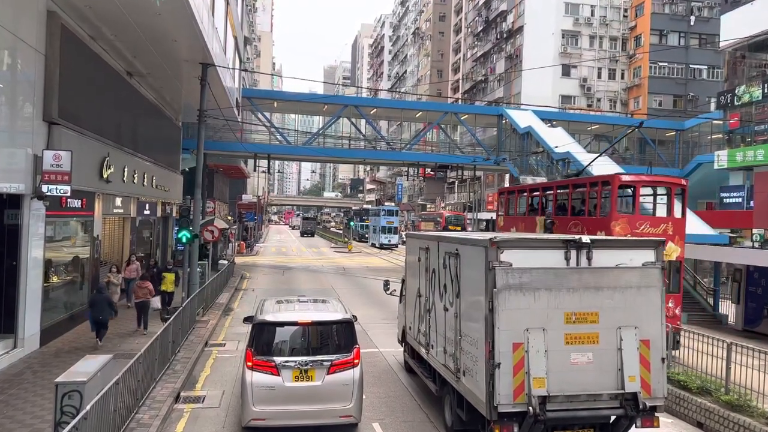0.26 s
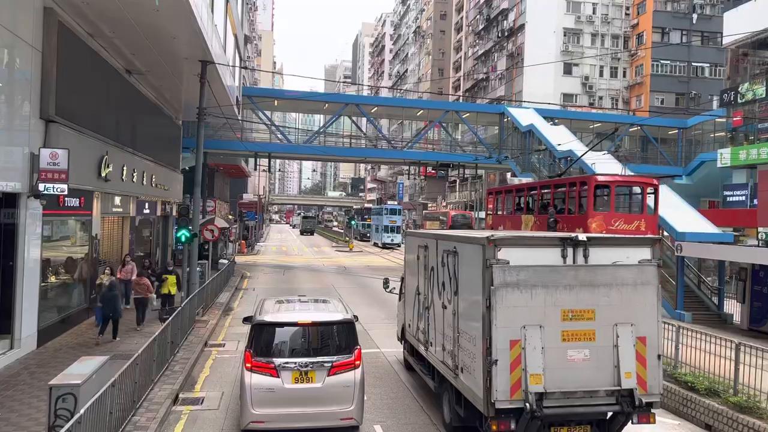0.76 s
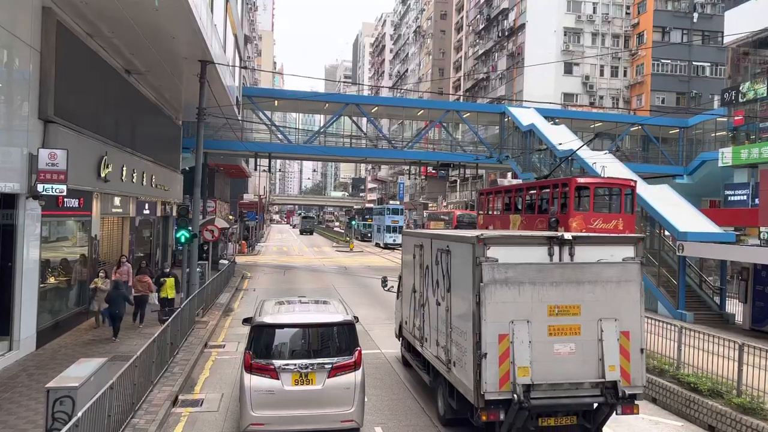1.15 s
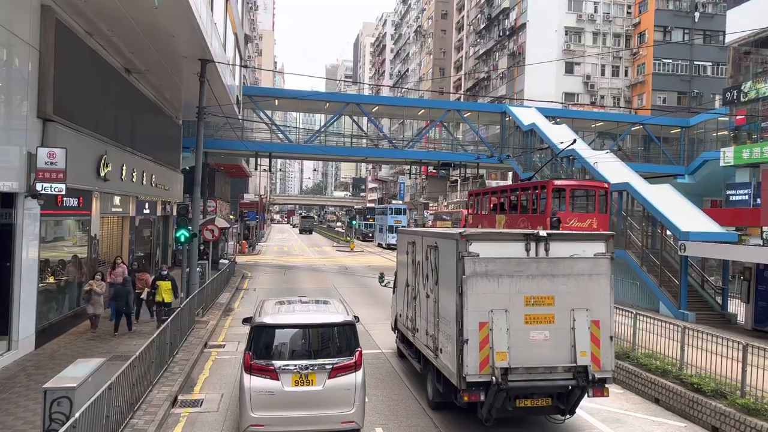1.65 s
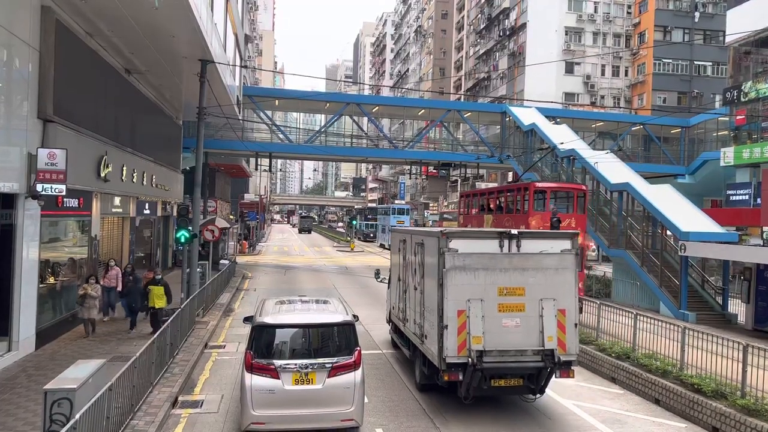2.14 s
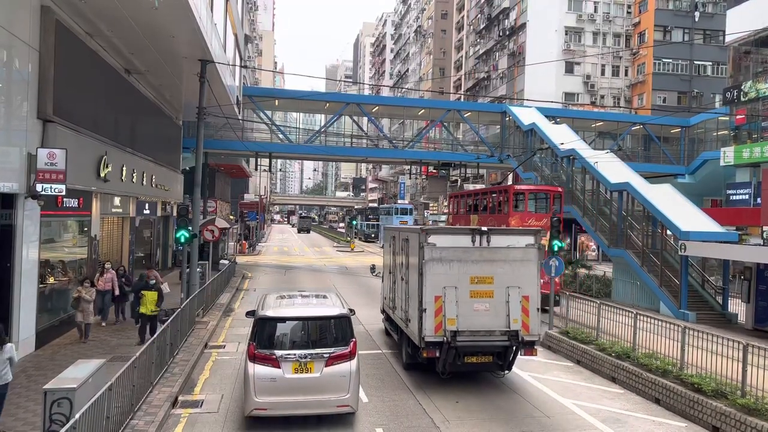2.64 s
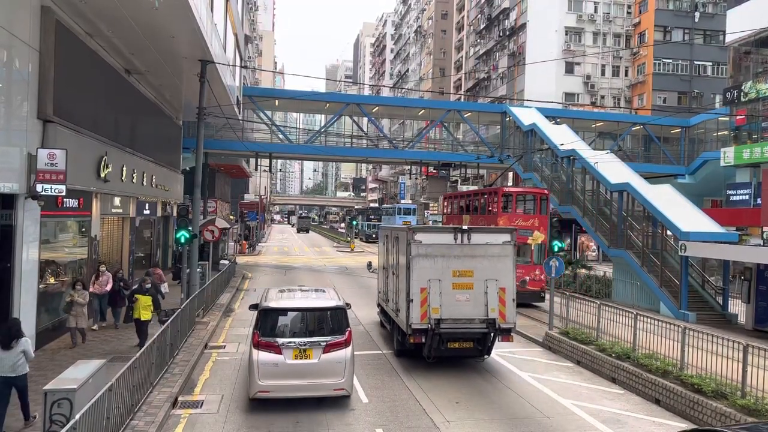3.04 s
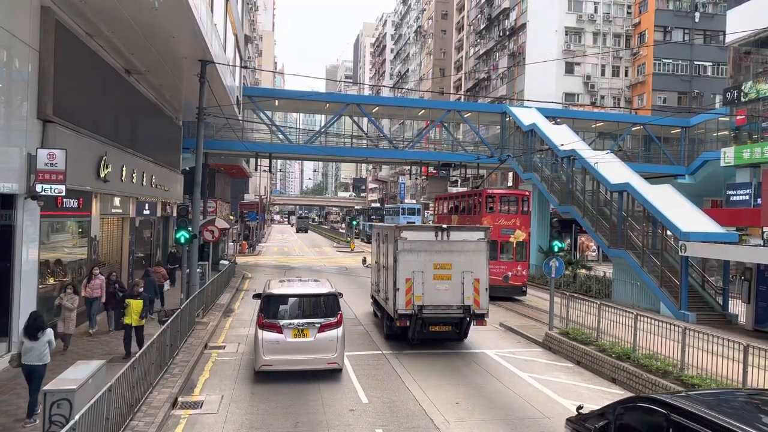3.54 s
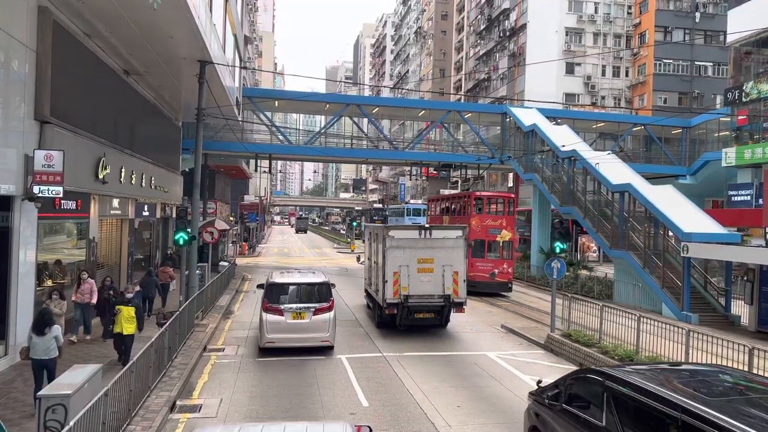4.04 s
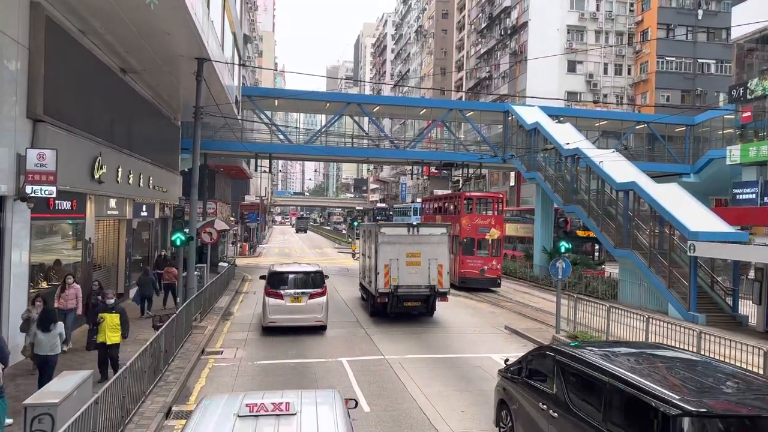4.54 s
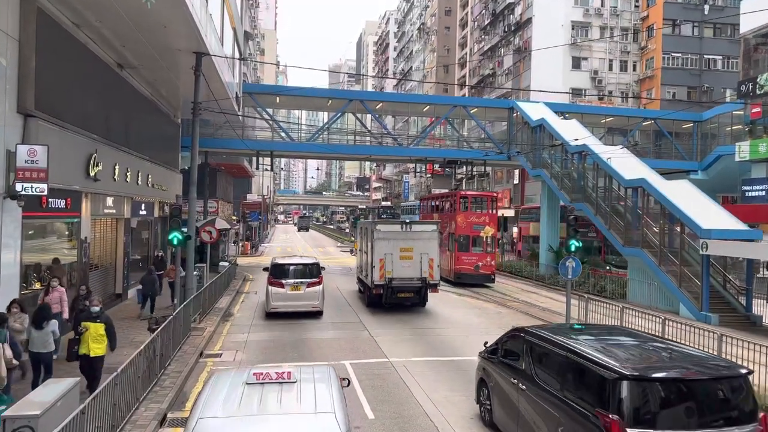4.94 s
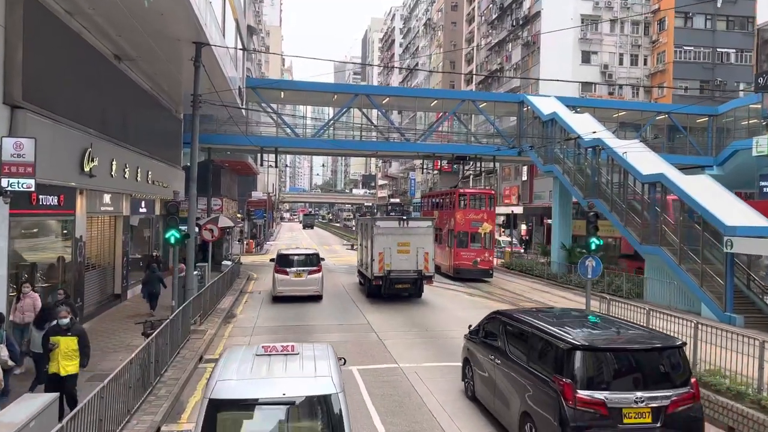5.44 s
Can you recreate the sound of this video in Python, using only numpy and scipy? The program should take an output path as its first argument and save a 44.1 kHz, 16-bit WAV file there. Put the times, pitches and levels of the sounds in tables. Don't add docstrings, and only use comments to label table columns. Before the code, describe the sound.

Aboard a bus, a low diesel idle and an echoing horn give way to a loud, rising engine as it sets off.

```python
import sys
import numpy as np
from scipy import signal
from scipy.fft import rfft, irfft
from scipy.io import wavfile
from scipy.ndimage import uniform_filter1d

SR = 44100
rng = np.random.default_rng(int(sys.argv[2]) if len(sys.argv) > 2 else 0)


def how_loud(loudness_db):
    steps = np.asarray(loudness_db, float) / 20
    return 10 ** steps


def wav_out(sig):
    wavfile.write(sys.argv[1], SR, np.round(np.clip(np.atleast_2d(sig).T, -1, 1) * 32767).astype(np.int16))


N = 250929
T = np.arange(N) / SR
HZ = np.fft.rfftfreq(N, 1 / SR) + 1


def unit(x):
    return x / np.sqrt(np.mean(np.abs(x) ** 2))


def over_time(table):
    s, *columns = np.transpose(table)
    return [np.interp(T, s, column) for column in columns]


def over_hz(table):
    hz, value = np.transpose(table)
    return np.interp(np.log(HZ), np.log(hz), value)


def walk(rate):
    hold = int(SR / rate)
    steps = np.repeat(rng.standard_normal(N // hold + 1), hold)
    smooth = uniform_filter1d(uniform_filter1d(steps, hold), hold)
    return unit(smooth[:N])


def fading(share, rate):
    share = np.clip(share, 0, 1)
    scattered = walk(rate) + 1j * walk(rate)
    return np.sqrt(1 - share) + np.sqrt(share / 2) * scattered


def noise(shape):
    return unit(irfft(rfft(rng.standard_normal(N)) * shape, N))


def peak(hz, width):
    return 1 / np.sqrt(1 + ((HZ - hz) / (width / 2)) ** 2)


# f/Hz, width/Hz, level/dB
CABIN_MODES = [(70.2, 2.7, -20), (73.76, 7.7, -18), (82.6, 4.6, -22.5), (104, 9, -31.5), (121, 16, -31),
               (146.8, 5.2, -29), (157.7, 14.3, -25), (181.3, 11, -28), (196.8, 7.3, -26.5),
               (220.5, 13.7, -20), (237, 21, -28.5), (396, 30, -47.5), (446, 25, -34.5)]


def cabin_db(hz):
    power = 0
    for centre_hz, width, db in CABIN_MODES:
        power = power + how_loud(2 * db) / (1 + ((hz - centre_hz) / (width / 2)) ** 2) ** 2
    return 10 * np.log10(power)


# t/s, firing rate f/Hz, firing line level/dB
ENGINE_RUN = [(0.0, 35.07, -22), (1.8, 35.07, -22.5), (2.06, 35.75, -23), (2.3, 40.14, -23),
              (2.41, 39.69, -23), (2.6, 36.82, -61), (2.77, 35.86, -27), (3.14, 35.67, -34),
              (3.22, 36.08, -18), (3.38, 39.22, -26), (3.46, 40.59, -13.5), (3.68, 44.97, -9.5),
              (3.92, 48.78, -10), (4.3, 51.38, -11.5), (4.72, 56.3, -12.5), (5.02, 57.75, -11.5),
              (5.3, 59.28, -12.5), (5.69, 62.76, -13)]
# t/s, load (0-1)
ENGINE_LOAD = [(0, 0.24), (2.05, 0.01), (2.3, 0.8), (2.7, 0.6), (3.2, 0.11), (3.6, 0.66), (4.2, 0.7),
               (4.7, 0.78), (5.2, 0.95), (5.69, 0.95)]
WEAK_ORDER_SIXTHS = [4, 8, 9, 10, 14, 15, 16, 18, 22, 30, 36]
# idle level/dB, full-load level/dB
WEAK_ORDER_LEVELS = [(-49, -54.5), (-42, -43), (-57.5, -24.5), (-54, -44.5), (-39.5, -35), (-35.5, -38.5),
                     (-55, -42.5), (-40.5, -38), (-40, -50), (-45.5, -43), (-34.5, -69)]
COAST_DB, COAST_SHARE = -29.5, 0.48


def engine():
    hz, first_db = over_time(ENGINE_RUN)
    coast_db = COAST_SHARE * np.minimum(first_db - COAST_DB, 0)
    turn = 2 * np.pi * np.cumsum(hz * (1 + 0.002 * walk(12))) / SR
    load = np.clip(over_time(ENGINE_LOAD)[0], 0, 1)
    # order, level in dB, wavering share
    orders = [(1, first_db, .02), (2, cabin_db(2 * hz) + coast_db, .03),
              (4, cabin_db(4 * hz), .025), (8, cabin_db(8 * hz), .15)]
    for sixths, (idle_db, full_db) in zip(WEAK_ORDER_SIXTHS, WEAK_ORDER_LEVELS):
        orders.append((sixths / 6, idle_db + load * (full_db - idle_db), .15))
    out = 0
    for order, db, share in orders:
        out = out + how_loud(db) * np.exp(1j * order * (turn + order)) * fading(share, 14)
    ports = np.array([[how_loud(-1.24)], [how_loud(-2.5) * np.exp(.15j)]])
    return np.sqrt(2) * np.real(out * ports)


# t/s, length/s, level/dB
HORN_BLASTS = [
    (0.076, 0.189, -28),
    (0.332, 1.26, -28.5),
]
HORN_ATTACK_S, HORN_RELEASE_S, ECHO_DB, ECHO_T60_S = 0.065, 0.021, -6, 0.48
SAG_DB_PER_S = 2


def blow():
    out = 0
    for s, length, db in HORN_BLASTS:
        after = np.maximum(T - s - length, 0)
        attack = np.clip((T - s) / HORN_ATTACK_S, 0, 1)
        direct = np.clip(1 - after / HORN_RELEASE_S, 0, 1)
        echo = how_loud(ECHO_DB - 60 * after / ECHO_T60_S)
        held = how_loud(db - SAG_DB_PER_S * np.clip(T - s, 0, length))
        out = out + held * attack * np.maximum(direct, echo)
    return out


# left level/dB, right level/dB, phase lead of left/rad, fluttering share (0-1)
HORN_HARMONICS = [(13, 11, 2.5, 0.03), (2.5, -1, -2, 0.25), (3.5, 2, -1.5, 0.06), (4, 3, 2.5, 0.16),
                  (-1, 0, 0.57, 0.29), (-6.5, -8.5, 0.8, 0.41), (-8, -14, 4.5, 0.3), (-15, -18, 1, 0.33),
                  (-16, -28.5, 6, 0.42), (-17, -45, -0.5, 0.2), (-17.5, -36.5, 2, 0.9), (-20, -45, 1, 0.57),
                  (-22.5, -38, 2.5, 0.2), (-27, -38, -1.5, 0.3), (-52, -53, 19, .5),
                  (-29, -48.5, -4.5, 0.1), (-29, -55, 7, .5), (-47, -44, 11, .5)]
# f/Hz, level under the horn/dB
MATE_LINES = [(447, -8.5), (892, -35), (1342, -11.5), (1437, -10), (3360, -30), (4872, -34.5)]
# f/Hz, level/dB
RASP_SPECTRUM = [(900, -23), (1400, -14), (3000, 1), (6500, -13), (7500, -31), (8500, -17), (9700, -26),
                 (10500, -54.5)]
# t/s, 1st, 2nd and 3rd partial level/dB, 3rd partial left minus right/dB
STREET_PATHS = [(.1, 3, 1, 9, -8), (.2, -18.5, -0.5, -18.5, 20), (.28, -15, 10, -2, 7),
                (.34, -0.5, 8, 6.5, 1), (.48, -16, -1.5, -2.5, -4), (.56, -9.5, 1.5, -13, 3),
                (.64, -10, 5, 2.5, 10.5), (.78, -15, 3, 5, 4), (1.1, -12, 2, 6.5, -5),
                (1.27, -6.5, 1.5, 0, -10), (1.38, -7.5, -0.5, -4, -6), (1.6, -16.5, 5.5, -4.5, 9)]
HORN_HZ = 502.3
BEAT_HZ, BEAT_DEPTH = 56, .1


def horn():
    first_db, second_db, third_db, pan_db = over_time(STREET_PATHS)
    path_db = {0: first_db, 1: second_db, 2: third_db + np.array([pan_db, -pan_db]) / 2}
    hz = HORN_HZ + .5 * walk(12)
    turn = 2 * np.pi * np.cumsum(hz * (1 + .0013 * walk(150))) / SR
    beat = 2 * np.pi * np.cumsum(BEAT_HZ * (1 + 0.14 * walk(19.5))) / SR
    out = np.zeros((2, N))
    for k, (left_db, right_db, lead, share) in enumerate(HORN_HARMONICS):
        left = how_loud(left_db) * np.exp(1j * lead) * fading(.6 * share, 90)
        right = how_loud(right_db) * fading(.6 * share, 90)
        flutter = fading(.4 * share, 40) * fading(.5 * share, 170)
        flutter = flutter * (1 + BEAT_DEPTH * np.cos(beat + k))
        line = how_loud(path_db.get(k, 0)) * flutter * np.exp(1j * (k + 1) * turn)
        out += np.real(np.array([left, right]) * line)
    for line_hz, db in MATE_LINES:
        line = np.exp(2j * np.pi * line_hz * T)
        out += how_loud(db) * np.real([fading(.7, 40) * line for _ in range(2)])
    rasp = how_loud(over_hz(RASP_SPECTRUM))
    out += how_loud(-20) * np.array([noise(rasp), 1.6 * noise(rasp)])
    return out * blow()


# f/Hz, width/Hz, level/dB
SLIT_RESONANCES = [(2290, 670, -49), (4530, 380, -54), (4960, 350, -61), (6730, 400, -62),
                   (8650, 630, -68.5)]
VALVE_SHUT_S = 2.145


def brake_air():
    hiss = 0
    for hz, width, db in SLIT_RESONANCES:
        shape = peak(hz, width) ** 2
        hiss = hiss + how_loud(db + 1.5 * walk(16)) * np.array([noise(shape), .5 * noise(shape)])
    return hiss * np.clip((VALVE_SHUT_S - T) / 0.015, 0, 1)


# t/s, peak level/dB, ring t60/s, low part
# relative level/dB, left minus right/dB
FITTING_KNOCKS = [(0.2216, -28.5, 0.19, 6.5, 6.5), (2.1395, -27, 0.22, 1.5, 5), (3.675, -37.5, 0.22, -4, 9),
                  (3.7236, -32, 0.25, 2, 3), (4.2096, -33, 0.32, 1.5, 4.5), (4.6694, -37, 0.23, 1.5, 7),
                  (4.943, -28.5, 0.18, 0.5, 5.5), (4.964, -38.5, 0.6, -17, 10.5),
                  (5.044, -31, 0.2, 6.5, 3.5), (5.0787, -43.5, 0.2, -5, 0.5), (5.2424, -23.5, 0.2, 2, 1.5)]
CLACK_TOP_DB, CLACK_RISE_S = -18.5, 0.0019


def clacks():
    body_shape = peak(4300, 4500) ** 2 + .15 * peak(8400, 900)
    low_shape = peak(2000, 1500) ** 2
    body = np.array([noise(body_shape), noise(body_shape)])
    low = np.array([noise(low_shape), noise(low_shape)])
    top = noise(peak(12500, 4500) ** 2)
    out = np.zeros((2, N))
    for s, db, t60, low_db, pan_db in FITTING_KNOCKS:
        age = np.maximum(T - s, 0)
        envelope = (1 - np.exp(-age / CLACK_RISE_S)) * how_loud(-60 * age / t60)
        burst = body + how_loud(low_db) * low + how_loud(CLACK_TOP_DB) * top
        out += how_loud(db - 9.5) * envelope * burst * how_loud([[pan_db / 2], [-pan_db / 2]])
    return out


# t/s, peak level/dB
PLASTIC_TICKS = [(1.9753, -51.5), (2.804, -55), (2.9132, -50.5), (2.942, -59), (3.1373, -52.5),
                 (3.1664, -59), (3.195, -50.5), (3.223, -54), (3.2503, -49.5), (3.28, -58), (3.3354, -51)]


def ticks():
    top = noise(peak(12500, 4500) ** 2)
    out = np.zeros((2, N))
    for s, db in PLASTIC_TICKS:
        age = np.maximum(T - s, 0)
        out += how_loud(db + 1.0) * (T > s) * how_loud(-60 * age / .008) * top
    return out


# t/s, half length/s, level/dB
SPRING_PUFFS = [
    (2.69, 0.046, -54),
    (3.469, 0.099, -51),
    (4.9, 0.052, -60),
    (5.633, .05, -52),
]


def puffs():
    swell = sum(how_loud(db) * np.exp(-((T - s) / half) ** 2) for s, half, db in SPRING_PUFFS)
    shape = peak(5600, 2500) ** 2 + .1 * peak(12500, 3000) ** 2
    return swell * np.array([noise(shape), 0.74 * noise(shape)])


# f/Hz, level per Hz/dB
LOW_SPECTRUM = [(11, -38.5), (18, -8.5), (44, -1), (67, -8), (118, -14), (153, -16), (219, -17.5),
                (337, -18), (384, -22.5), (463, -19.5), (675, -28), (1160, -25.5), (1600, -42.5),
                (2080, -73), (3520, -120)]
# f/Hz, level per Hz/dB
HIGH_SPECTRUM = [(820, -30), (1400, 0), (1460, 16), (1560, 2), (1910, 4), (2590, -2), (2800, -3.5),
                 (3910, -8.5), (5680, -10), (7600, -21), (9110, -18.5), (10600, -6.5), (12600, -26.5),
                 (14800, -40.5), (15500, -32.5)]
WASH_LOW_DB, WASH_HIGH_DB = -26.5, -48.5
# f/Hz, left-right likeness (-1 to 1)
PORT_LIKENESS = [(60, 1), (130, 0.44), (290, 0.74), (640, 0.023), (1410, 0.14), (3100, 0.19), (6820, -0.14),
                 (10000, -0.96), (11500, 0.0057), (15000, .9)]
# f/Hz, left minus right/dB
PORT_LEAN = [(60, 0), (110, 9.5), (200, 4.5), (380, -0.5), (700, -2.5), (1290, 3), (2380, -1.5),
             (4400, 8.5), (8120, 13.5), (15000, -11.5)]
# t/s, level/dB
STREET_BUSTLE = [(0, 1), (.6, 6), (1.6, 2), (1.9, 0), (2.45, -2), (2.7, 0), (2.9, -1), (3.2, 0.7),
                 (3.5, 1.5), (3.9, 1), (4.1, 0.5), (4.5, -1.5), (4.95, 2.5), (5.2, 0.7), (5.5, 0.5),
                 (5.69, 4.5)]
REGION_SHARES = [
    .2,
    .4,
    1.01,
    2.199,
]
RUMBLE_LOAD_DB = 2.5


def wash():
    bustle_db = over_time(STREET_BUSTLE)[0]
    trends_db = [share * bustle_db for share in REGION_SHARES]
    trends_db[0] = trends_db[0] + RUMBLE_LOAD_DB * over_time(ENGINE_LOAD)[0]
    low = how_loud(over_hz(LOW_SPECTRUM)) * (HZ < 1500)
    high = how_loud(over_hz(HIGH_SPECTRUM)) * (HZ >= 1500)
    colour = how_loud(WASH_LOW_DB) * low / np.linalg.norm(low)
    colour = colour + how_loud(WASH_HIGH_DB) * high / np.linalg.norm(high)
    like = np.clip(over_hz(PORT_LIKENESS), -1, 1)
    mid = rfft(rng.standard_normal(N)) * np.sqrt(len(HZ) * (1 + like) / 2)
    side = rfft(rng.standard_normal(N)) * np.sqrt(len(HZ) * (1 - like) / 2)
    lean = how_loud(over_hz(PORT_LEAN) / 2)
    ports = colour * np.array([(mid + side) * lean, (mid - side) / lean])
    out, swell = 0, walk(1.38)
    for centre in 20 * 2 ** np.arange(0, 10, .5):
        mask = np.cos(np.pi * np.clip(np.log2(HZ / centre), -.5, .5)) ** 2
        trend_db = trends_db[np.searchsorted([330, 1700, 10500], centre)]
        out = out + irfft(ports * mask, N) * how_loud(trend_db + 0.27 * swell + walk(9))
    return out


# f/Hz, width/Hz, level/dB
DUCT_RESONANCES = [(1206, 59, -46.5), (2640, 120, -64), (8700, 800, -70)]


def ventilation():
    out = 0
    for hz, width, db in DUCT_RESONANCES:
        shape = peak(hz, width)
        out = out + how_loud(db) * np.array([noise(shape), noise(shape)])
    return out


def scene():
    return engine() + horn() + brake_air() + clacks() + ticks() + puffs() + wash() + ventilation()


def low_pass(x):
    return signal.sosfilt(signal.butter(12, 15690, fs=SR, output="sos"), x)


def record(dry):
    hz = np.fft.rfftfreq(2 * N, 1 / SR) + 1
    hole = 1 - .9 * np.exp(-((hz - 10700) / 1050) ** 8)
    bass_cut = 1 / np.sqrt(1 + (31 / hz) ** 14)
    mirrored = np.hstack([dry, dry[:, ::-1]])
    heard = irfft(rfft(mirrored) * hole * bass_cut, 2 * N)[:, :N]
    return low_pass(heard)


dry = scene()
out = record(dry)
wav_out(out)
```